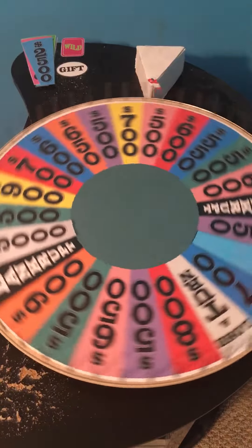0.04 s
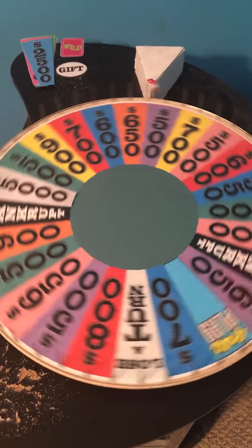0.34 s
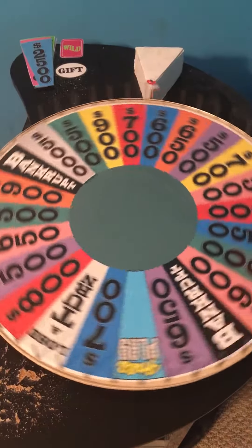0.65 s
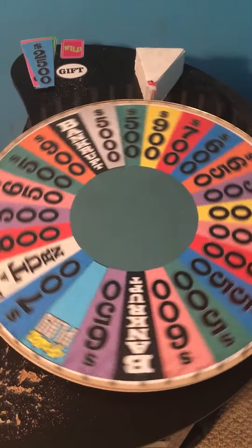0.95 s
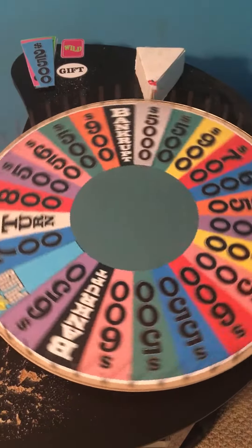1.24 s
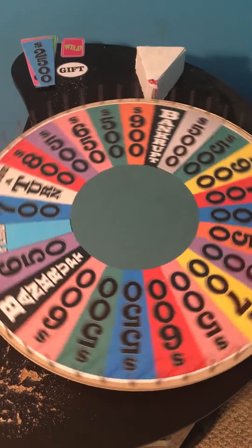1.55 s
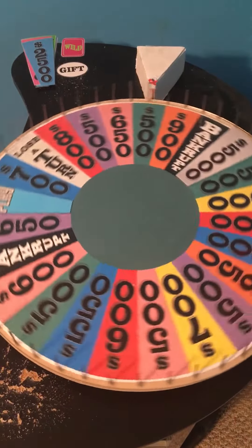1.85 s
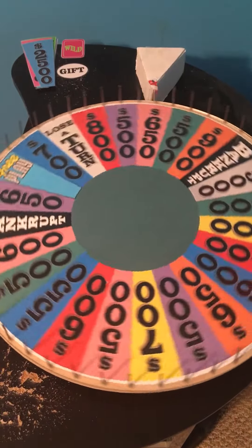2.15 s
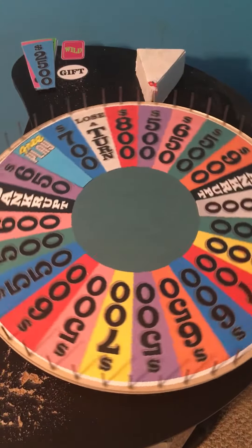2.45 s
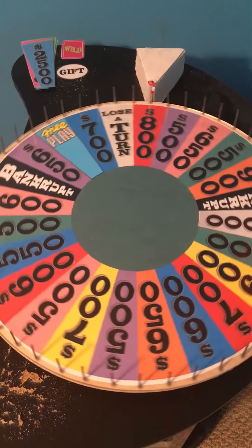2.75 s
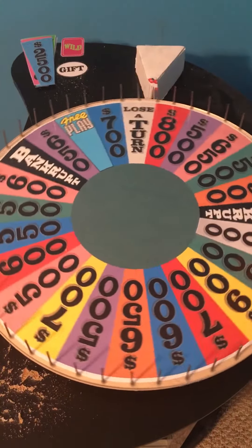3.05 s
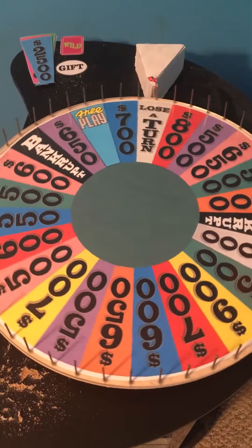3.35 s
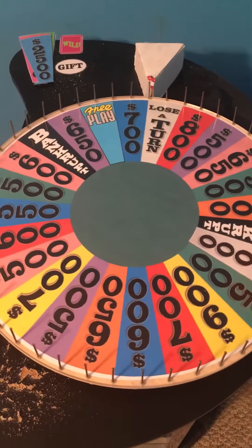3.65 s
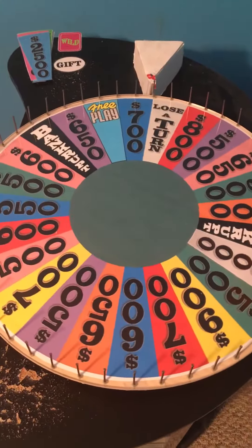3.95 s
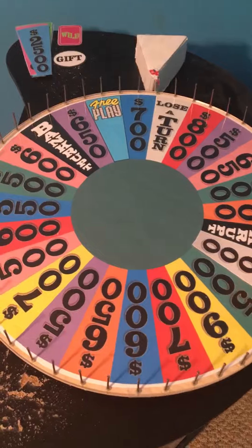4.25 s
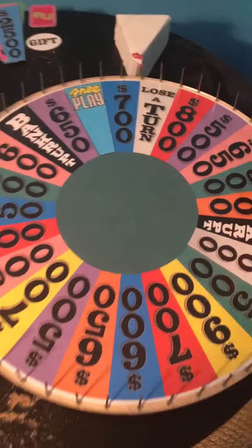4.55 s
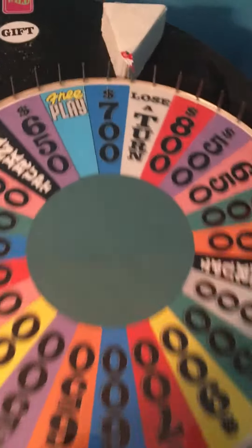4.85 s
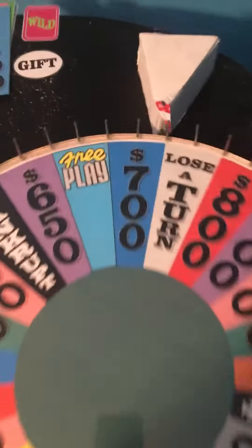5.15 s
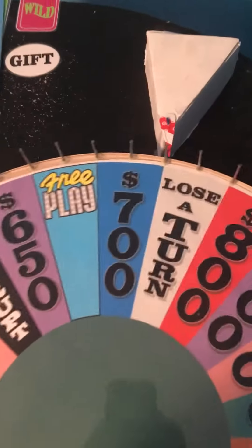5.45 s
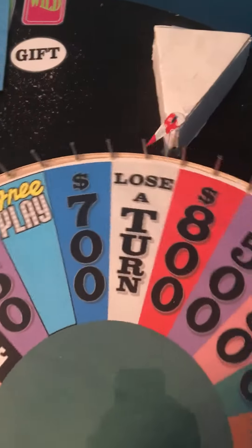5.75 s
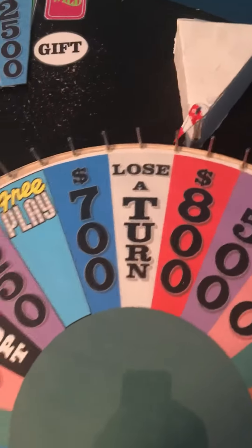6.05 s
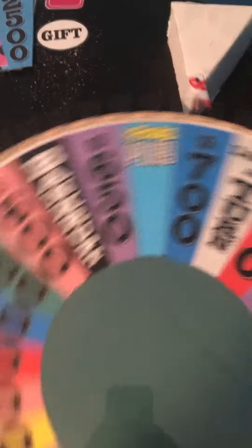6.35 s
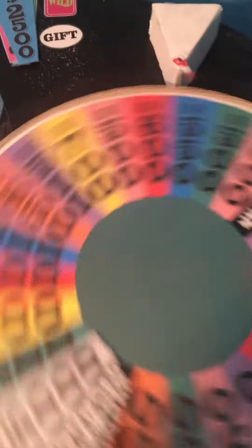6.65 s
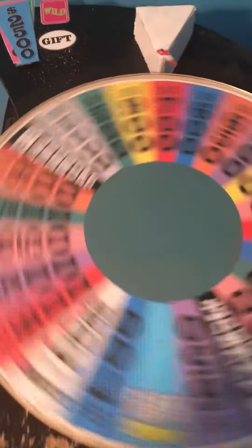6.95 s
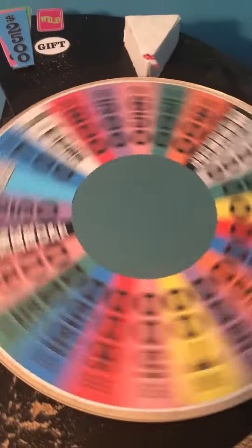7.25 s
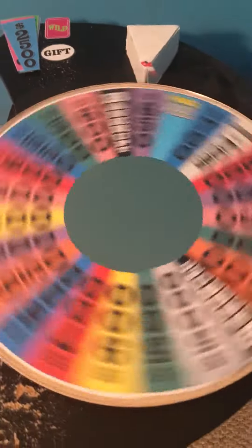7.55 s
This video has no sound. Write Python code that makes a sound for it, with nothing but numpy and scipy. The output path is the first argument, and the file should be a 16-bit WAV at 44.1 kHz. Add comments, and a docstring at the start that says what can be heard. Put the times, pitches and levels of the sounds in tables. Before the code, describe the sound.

A wooden prize wheel spins in a small room, its pegs snapping against a plastic pointer in a quick, bright rattle. The clicks slow, soften and stop. In the pause come a few soft steps and a faint brush of clothes, then some lone clicks as the wheel is rocked. It is then spun hard, and the clicks race while the bearing rumbles and knocks.

```python
"""A homemade wooden prize wheel coasts on a table in a small room, its bearing rumbling through the disc.
Each peg bends the plastic pointer, which snaps free and bounces back. As the wheel slows, the pegs
only nudge the pointer, and by 4 seconds it is still. In the pause someone steps up, clothes brushing.
A hand rocks the wheel back, then spins it hard at about 6.4 seconds: the snaps race,
and the bearing knocks and judders."""
import sys
import numpy as np
from scipy import signal
from scipy.fft import rfft, irfft
from scipy.io import wavfile
from scipy.ndimage import uniform_filter1d

SR = 44100
rng = np.random.default_rng(int(sys.argv[2]) if len(sys.argv) > 2 else 0)


def waveform_to_disk(signal):
    """Save audio, clipped to [-1, 1], as 16-bit WAV at the path in sys.argv[1]."""
    frames = np.transpose(np.atleast_2d(signal))
    scaled = np.clip(frames, -1, 1) * 32767
    samples = np.round(scaled).astype(np.int16)
    wavfile.write(sys.argv[1], SR, samples)


N = 343539
T = np.arange(N) / SR
SHORT = T[:SR // 8]  # the time axis of one hit
PUSH_S, TOP_HZ = 6.3686, 15900  # when the hand spins the wheel; where the treble ends

# Lone snaps of the slow or rocked wheel. Each row: start in seconds, level in dB, pitch in Hz.
LONE_SNAPS = [(1.488, -39, 5360), (1.5916, -25.5, 5470), (1.6911, -38, 4960), (1.8031, -35.5, 5180),
              (1.9475, -44.5, 4650), (2.0721, -45, 4830), (2.1774, -30, 5140), (2.3059, -32.5, 5100),
              (2.4943, -49.5, 5030), (2.661, -49.5, 5060), (2.8403, -47.5, 5170), (3.0488, -48.5, 5200),
              (3.3356, -54, 5500), (5.7061, -41.5, 5200), (5.86, -27, 5060), (6.309, -37.5, 5350)]

def pointer():
    """The pointer slips off each peg and shakes its mount; after a firm or fast peg it bounces back."""
    out = np.zeros(N)
    # the mount's level changes only about half as much as the snap's
    lone = [(s, db, hz, 0.53 * db - 19.5) for s, db, hz in LONE_SNAPS]
    for s, db, hz, mount_db in pegs() + lone:
        add(out, s, blow(snap(hz, seconds=0.0041, ring_db=4.5), db + 0.24))
        add(out, s, blow(mount(low_db=-4, high_db=-1), mount_db))
        if db > -36 or speed(s) > 9:
            # a faster wheel makes the bounce sooner and harder
            pace = max(speed(s) / 8, 1)
            bounce_s = s + .0272 / pace ** .62
            bounce_db = -36 + 1.14 * np.log2(pace)
            add(out, bounce_s, blow(snap(hz, seconds=0.0037, ring_db=3), bounce_db))
            add(out, bounce_s, blow(mount(low_db=-7, high_db=-4.5), mount_db - 4))
            # it settles with a longer, softer chatter
            add(out, bounce_s + 0.0086, blow(snap(hz, seconds=0.0063, ring_db=3), bounce_db - 6))
    return out

# Stretches when every peg flicks the pointer. Each row: start in seconds, end in seconds.
SPINS = [(-.0197, 1.45), (PUSH_S, 7.79)]
# How hard the pegs bend it. Each row: time in seconds, snap level in dB, pitch in Hz, mount level in dB.
PEG_FORCE = [(0, -33, 5170, -31.5), (.12, -24, 5260, -31.5), (.26, -25.5, 4950, -35.5),
             (.42, -23.5, 5600, -36.5), (.55, -21.5, 5500, -37.5), (.68, -29, 4680, -40),
             (.93, -19, 5600, -36), (1.03, -24, 5600, -31.5), (1.116, -31.5, 5800, -38.5),
             (1.2, -22.5, 5850, -37.5), (1.39, -26, 5250, -32.5), (6.37, -25.5, 5530, -31),
             (6.52, -24, 4980, -39), (6.75, -20, 5220, -47), (6.85, -22, 5500, -36), (7.02, -20, 5150, -32),
             (7.15, -19, 5760, -29.5), (7.3, -24.5, 4980, -33.5), (7.555, -27, 5260, -34),
             (7.59, -22.5, 5020, -27.5), (7.79, -21.5, 5260, -36.5)]

def pegs():
    """List one snap for each passing peg; no two pegs stand quite alike, so level and pitch vary."""
    times, *columns = np.transpose(PEG_FORCE)
    rows = []
    for s, end in SPINS:
        while s < end:
            db, hz, mount_db = (np.interp(s, times, column) for column in columns)
            louder, higher = rng.standard_normal(2)
            rows.append((s, db + 1.5 * louder, hz * (1 + .035 * higher), mount_db))
            halfway_s = s + .5 / speed(s)
            s += 1 / speed(halfway_s)
    return rows

def speed(s):
    """Pegs per second at time s: friction slows the wheel evenly, and the hand speeds it up."""
    push_length_s = .2872
    coast = np.maximum(14.98 - 3.254 * s, 0)
    push = np.interp(s - PUSH_S, [0, push_length_s], [24.402, 45.764])
    spin = push - 3.629 * np.maximum(s - PUSH_S - push_length_s, 0)
    return np.where(s < PUSH_S, coast, spin)

# The tone of a snap's click. Each row: frequency in Hz, level in dB.
CLICK_TONE = [(1500, -34.5), (3200, -14.5), (4500, 11.5), (6000, 0.5), (8500, 0), (10300, -3.5), (12000, 5),
              (16000, -9)]

def snap(hz, seconds, ring_db):
    """Plastic buzzes on metal and the pointer's tip rings twice over, pitched by where the peg held it."""
    buzz = rng.standard_normal(len(SHORT)) * np.exp(-(SHORT / seconds) ** 2)
    tip = through(through(buzz, ring(hz, width_hz=800)), ring(hz, width_hz=1080))
    # the treble comes from the first, hardest part of the contact
    edge = buzz * np.exp(-SHORT / seconds / 2.2)
    click = through(edge, colour(CLICK_TONE))
    overtone = through(edge, ring(min(2.78 * hz, TOP_HZ), width_hz=700))
    overtone_db = -3 + 4 * rng.standard_normal()
    return unit(click) + amp(ring_db) * unit(tip) + amp(overtone_db) * unit(overtone)

# The notes of the pointer on its mount. Each row: pitch in Hz, width in Hz, level in dB.
MOUNT_NOTES = [(337, 16.3, 1.5), (542, 26, -11.5), (837, 130, -5), (1146, 66, 3), (1364, 76, -3.5),
               (2147, 51, 0.5), (2370, 63, -6)]

def mount(low_db, high_db):
    """The mount rings a little differently each time; low_db and high_db tilt its low and high notes."""
    out = np.zeros(len(SHORT))
    for k, (hz, width, db) in enumerate(MOUNT_NOTES):
        stray_db, detune = rng.standard_normal(2) * [3, .015]
        tilt_db = np.interp(hz, [350, 500, 1400, 2100], [low_db, 0, 0, high_db])
        note = (-1) ** k * amp(db + stray_db + tilt_db) * ring(hz * (1 + detune), width)
        add(out, .013 if k == 0 else 0, note)  # the lowest note comes late
    return disperse(out, lag_s=0.004064)

# Slow pegs touching the pointer. Each row: start in seconds, level in dB, brightness in dB.
PEG_NUDGES = [(1.9055, -46.5, -1), (2.031, -45.5, -2), (2.179, -33.5, 9), (2.3066, -42.5, 7),
              (2.435, -45, -6), (2.6029, -44.5, -3), (2.7622, -47.5, -2), (2.9803, -45.5, -4.5),
              (3.209, -45, -2.5), (3.6042, -45, -3), (3.7917, -55.5, -1), (3.955, -63, 1),
              (5.72, -41.5, -12), (5.863, -32.5, -11), (5.9071, -38, -5), (6.323, -39, -7)]

def nudges():
    """A slow peg leans on the pointer: a light touch, then a push with a faint buzz."""
    out = np.zeros(N)
    for s, db, bright_db in PEG_NUDGES:
        sway_db = 1.94 * (-51.5 - db)  # a softer push favours the mount's lowest note
        add(out, s - .009, blow(mount(low_db=0, high_db=bright_db), db - 5.5))
        add(out, s, blow(mount(low_db=sway_db, high_db=bright_db), db + 1.5))
        add(out, s, blow(snap(5060, seconds=0.0086, ring_db=-8), db - 12.5))
    return out

# The tone of the wooden disc. Each row: frequency in Hz, level in dB.
DISC_TONE = [(80, -19), (160, -12.5), (225, -7), (400, -12), (495, -0.5), (590, -3.5), (730, -0.5),
             (880, -8.5), (1200, -5), (1550, -14), (2400, -16.5), (3100, -25), (14000, -48)]
# The disc knocks on its bearing. Each row: start in seconds, level in dB.
DISC_KNOCKS = [(0.5228, -40.5), (0.7633, -42.5), (1.777, -46), (2.0, -56), (2.6738, -46), (2.9493, -58),
               (5.39, -59), (5.6563, -47.5), (5.787, -48), (6.2827, -32.5), (6.3616, -35)]

def wheel():
    """The bearing rumbles, hisses and knocks through the wooden disc."""
    disc, roll_db = colour(DISC_TONE), rumble_db()
    rumble = steady(through(bearing_balls(roll_db), disc))
    rumble /= np.sqrt(uniform_filter1d(rumble ** 2, SR // 5))  # even out the loudness
    hiss = steady(through(np.diff(rng.standard_normal(N + 1)), disc))
    out = (rumble + amp(-7.5) * hiss) * amp(roll_db)
    knock = disperse(disc, lag_s=0.00594)
    for s, db in DISC_KNOCKS:
        add(out, s, blow(through(contact(0.0048, grit=1.0), knock), db + 8.5))
    return out

# Rumble as the hand rocks, grips and pushes the wheel. Each row: time in seconds, level in dB.
HAND_RUMBLE = [(5.1, -85), (5.55, -72), (5.68, -65), (5.85, -56), (6.03, -82), (6.25, -54), (6.35, -52),
               (6.39, -32), (6.6, -36), (6.7, -70)]

def rumble_db():
    """The rumble grows with the wheel's speed and under the weight of the hand."""
    silent_speed, top_speed = 4, 45.764  # pegs per second
    pace = np.maximum(speed(T) - silent_speed, 0) / (top_speed - silent_speed)
    rolling = amp(-32) * pace ** 1.4
    pressing = amp(np.interp(T, *np.transpose(HAND_RUMBLE)))
    return 20 * np.log10(np.hypot(rolling, pressing))

def bearing_balls(roll_db):
    """The balls jostle, more often the harder they roll; each gives a brief note that sags in pitch."""
    out = np.zeros(N)
    bumps_per_s = 900 * amp(.45 * (roll_db - roll_db.max())) + 80
    count = np.cumsum(bumps_per_s) / SR
    for k, (when, pitch, size) in enumerate(rng.random((4000, 3))[:int(count[-1])]):
        hz = 140 * 14 ** pitch
        cycles = np.arange(-4, 4, hz / SR)
        note = np.exp(-(cycles / 1.87) ** 2) * np.sin(2 * np.pi * cycles * (1 - 0.0092 * cycles))
        add(out, np.searchsorted(count, k + when) / SR, note * hz * amp(16.5 * size))
    return out

# Bearing judders. Each row: loudest moment in seconds, level in dB, pitch in Hz, fade time in seconds.
BEARING_JUDDERS = [(.272, -34, 705, 0.011), (.712, -30.5, 739, 0.024), (.793, -40.5, 731, 0.033),
                   (1.184, -38, 510, 0.0074), (6.619, -15.5, 704, 0.0032), (7.024, -15.5, 704, 0.0035),
                   (7.277, -22, 755, 0.0033), (7.62, -19, 747, 0.0066), (7.717, -20.5, 762, 0.013)]

def judders():
    """The bearing judders and the disc sings a note that swells quickly and fades."""
    out, middle = np.zeros(N), SHORT[len(SHORT) // 2]
    age = SHORT - middle
    for s, db, hz, fade_s in BEARING_JUDDERS:
        swell = np.exp(np.minimum(age / 0.0038, -age / fade_s))
        add(out, s - middle, amp(db) * swell * np.sin(2 * np.pi * hz * age))
    return out

def ticks():
    """The rolling bearing gives small dry ticks, one at a random moment for each passing peg."""
    out, roll_db = np.zeros(N), rumble_db()
    count = np.cumsum(speed(T)) / SR
    note = through(ring(2410, width_hz=1470), ring(2410, width_hz=5600))
    for k, (when, size) in enumerate(rng.random((300, 2))[:int(count[-1])]):
        i = np.searchsorted(count, k + when)
        add(out, T[i], blow(note, -33.5 + 0.49 * roll_db[i] + 8 * (size - .5)))
    return disperse(out, lag_s=0.00486)

# Footfalls. Each row: start in seconds, level in dB, contact time in milliseconds.
FOOTFALLS = [(4.257, -57.5, 3.2), (4.343, -49.5, 0.57), (4.414, -57, 0.31), (4.526, -35, 0.078),
             (4.555, -47, 0.37), (5.21, -57, 0.3), (5.242, -58, 6), (5.471, -55.5, 12), (5.656, -50, 2.9)]
# The tone of a foot on the floor. Each row: frequency in Hz, level in dB.
FLOOR_TONE = [(28, -49), (65, 6.5), (110, -6), (250, 6), (420, -3), (1800, -12), (3000, -36), (8000, -43.5)]

def footsteps():
    """Soft steps on the floor; a longer contact gives a duller thud."""
    out, floor = np.zeros(N), colour(FLOOR_TONE)
    for s, db, ms in FOOTFALLS:
        sole = through(contact(0.013, grit=0.98), np.exp(-SHORT * 1000 / ms))
        add(out, s, blow(through(sole, floor), db + 5))
    return out

# Swishes of cloth. Each row: loudest moment in seconds, level in dB, half the length in seconds.
CLOTH_SWISHES = [(4.52, -64.5, 0.038), (4.612, -57, 0.023), (4.841, -56.5, 0.019)]
# The tone of the cloth. Each row: frequency in Hz, level in dB.
CLOTH_TONE = [(300, -2.5), (1600, 1), (4000, -3), (9000, -14), (16000, -23)]

def clothes():
    """Clothes brush in short swells of noise."""
    swells = sum(amp(db) * np.exp(-.5 * ((T - s) / half) ** 2) for s, db, half in CLOTH_SWISHES)
    return swells * noise(CLOTH_TONE)

# The room's echo. Each row: frequency in Hz, seconds to fade by 60 dB, level in dB against direct sound.
ROOM_ECHO = [(189, 0.21, 0), (1210, 0.22, -4), (5600, 0.24, -7), (12300, 0.21, -9.5)]

def room():
    """The room's answer to a click: direct sound, a bright slap off the wall behind, and a short tail."""
    t = T[:SR // 2]
    hz, fades_s, levels_db = np.transpose(ROOM_ECHO)
    log_hz = np.log(np.maximum(np.fft.rfftfreq(len(t), 1 / SR), 1))
    spectrum, response = rfft(rng.standard_normal(len(t))), np.zeros(len(t))
    for share, fade_s, db in zip(np.eye(len(hz)), fades_s, levels_db):
        band = irfft(spectrum * np.interp(log_hz, np.log(hz), share), len(t))
        tail = np.exp(-np.log(1000) * t / fade_s) * (1 - np.exp(-t / 0.00095))
        response += amp(db) * band * unit(tail)
    response[0] += 1
    add(response, .0093, amp(-12) * np.array([.5, -.5]))  # the slap
    return response

# The tone of the room's air. Each row: frequency in Hz, level in dB.
AIR_TONE = [(18, -23.5), (50, 5.5), (110, -7), (200, -9), (600, -18), (1500, -20.5), (4500, -26.5),
            (15500, -31.5)]

def air():
    """The air in the room makes a quiet, low hush."""
    return amp(-66.5) * noise(AIR_TONE)

def amp(db):
    """Turn decibels into a multiplier."""
    return 10 ** (np.asarray(db) / 20)

def unit(x):
    """Scale to an energy of one."""
    return x / np.sqrt(np.sum(x ** 2))

def steady(x):
    """Scale to an average power of one."""
    return x / np.std(x)

def blow(x, db):
    """Give a hit the energy of a 5 ms tone that peaks at db."""
    return unit(x) * amp(db) * np.sqrt(SR / 400)

def add(track, s, x):
    """Mix x into the track, starting at s seconds."""
    i = int(s * SR)
    x, i = x[max(-i, 0):], max(i, 0)
    track[i:i + len(x)] += x[:max(len(track) - i, 0)]

def through(x, response):
    """Play x through an object, given that object's answer to a click."""
    return signal.fftconvolve(x, response)[:len(x)]

def colour(tone, size=4096):
    """Turn a tone table into a click with that tone."""
    hz, db = np.transpose(tone)
    grid = np.maximum(np.fft.rfftfreq(size, 1 / SR), 1)
    cepstrum = irfft(np.log(amp(np.interp(np.log(grid), np.log(hz), db))))
    # folding onto the first half packs the sound at the start of the click
    cepstrum[1:size // 2] *= 2
    cepstrum[size // 2 + 1:] = 0
    return unit(irfft(np.exp(rfft(cepstrum))))

def noise(tone):
    """Steady noise shaped by a tone table."""
    return steady(through(rng.standard_normal(N), colour(tone)))

def ring(hz, width_hz):
    """One fading note; the wider it is, the sooner it dies."""
    return unit(np.exp(-np.pi * width_hz * SHORT) * np.sin(2 * np.pi * hz * SHORT))

def contact(seconds, grit):
    """A sharp push followed by a burst of tiny slips."""
    x = grit * unit(rng.standard_normal(len(SHORT)) * np.exp(-SHORT / seconds))
    x[0] += 1
    return x

def disperse(x, lag_s):
    """Bending waves carry high notes faster, so a knock becomes a falling chirp; lag_s stretches it."""
    hz = np.fft.rfftfreq(2 * len(x), 1 / SR)
    slowness = 1 / np.sqrt(np.clip(hz, 200, 2500) / 1000)
    delay = lag_s * (slowness - slowness[-1])
    phase = 2 * np.pi * np.cumsum(delay) * hz[1]
    return irfft(rfft(x, 2 * len(x)) * np.exp(-1j * phase))[:len(x)]

def scene():
    """Pointer, wheel and person sound in the room, over its quiet air."""
    walls = room()
    sources = amp(-1.5) * (pointer() + nudges())
    sources += amp(-3) * (wheel() + judders())
    sources += amp(0.8) * (footsteps() + clothes())
    sources += ticks()
    return (through(sources, walls) + air())[None]

def record(dry):
    """Cut the treble above TOP_HZ."""
    return signal.sosfilt(signal.ellip(8, .2, 70, TOP_HZ, fs=SR, output="sos"), dry)

dry = scene()
out = record(dry)
waveform_to_disk(out)
```